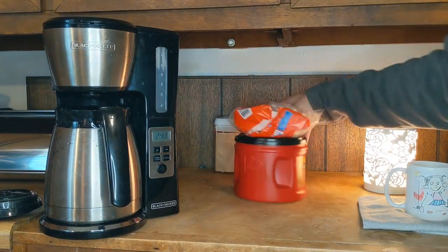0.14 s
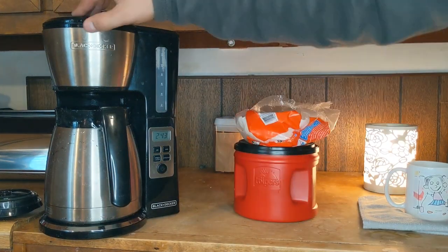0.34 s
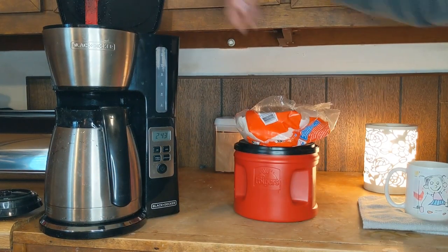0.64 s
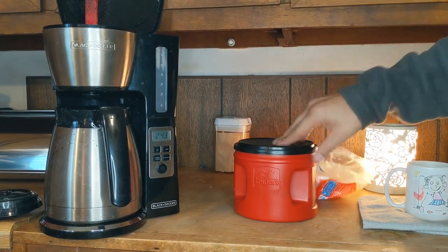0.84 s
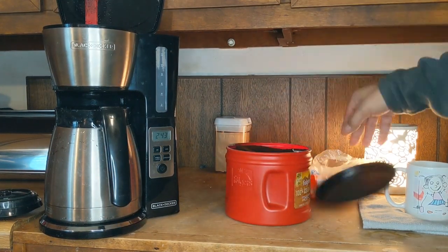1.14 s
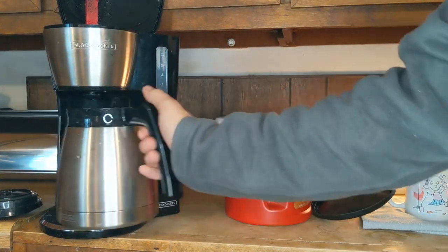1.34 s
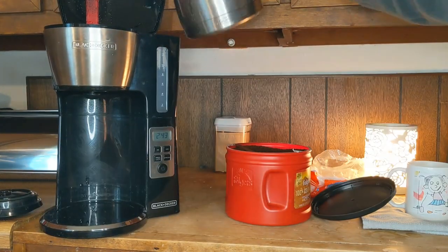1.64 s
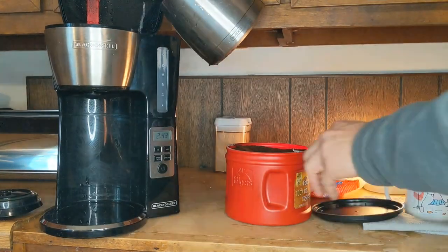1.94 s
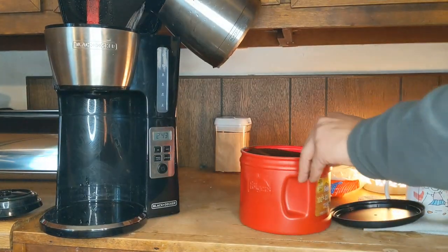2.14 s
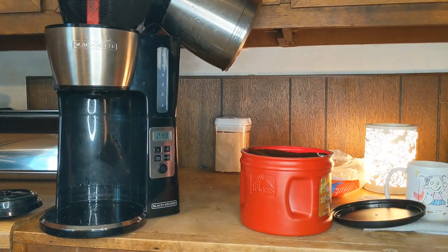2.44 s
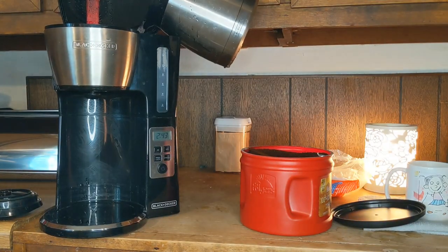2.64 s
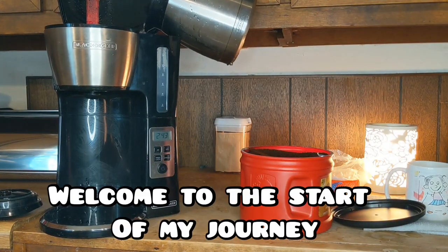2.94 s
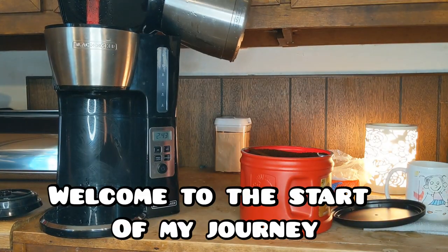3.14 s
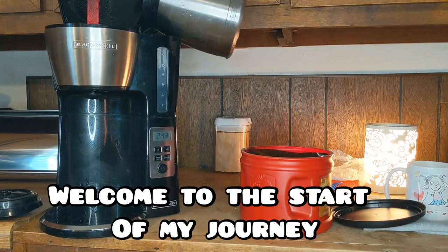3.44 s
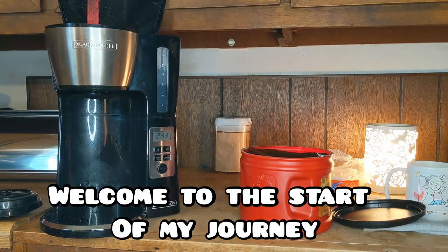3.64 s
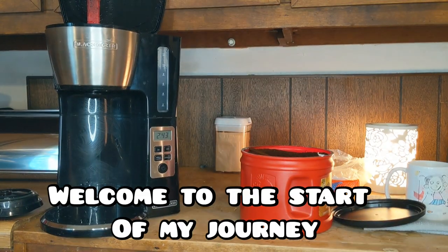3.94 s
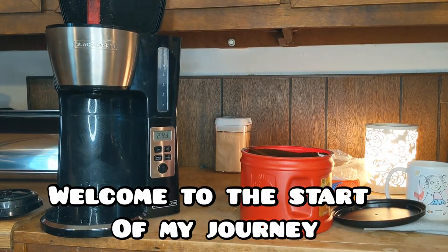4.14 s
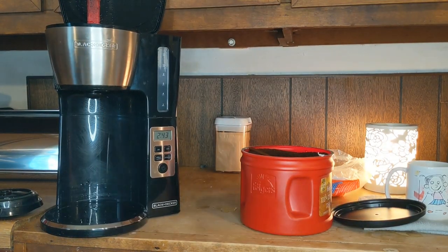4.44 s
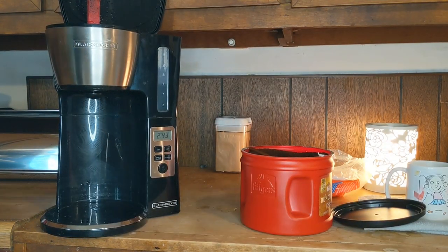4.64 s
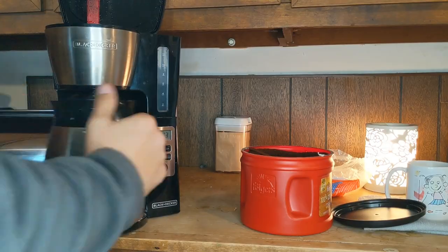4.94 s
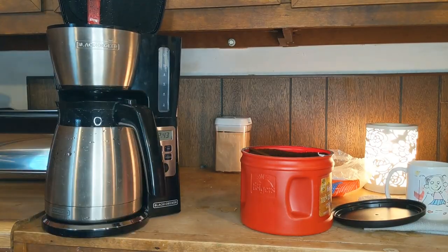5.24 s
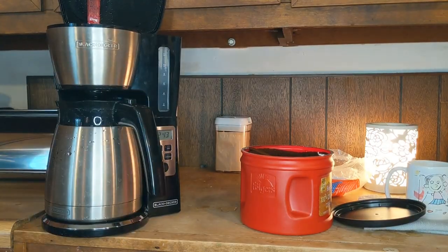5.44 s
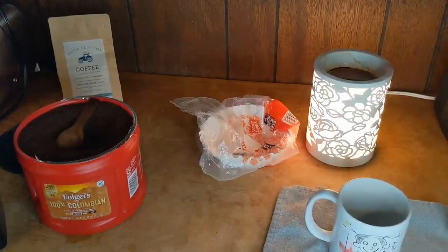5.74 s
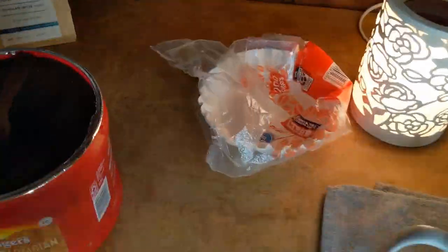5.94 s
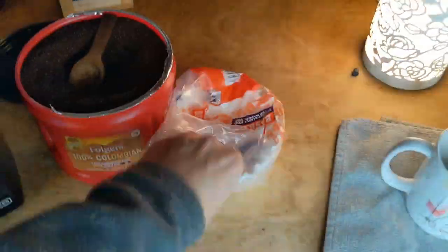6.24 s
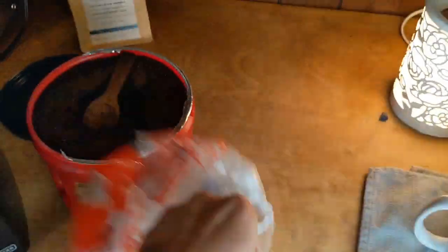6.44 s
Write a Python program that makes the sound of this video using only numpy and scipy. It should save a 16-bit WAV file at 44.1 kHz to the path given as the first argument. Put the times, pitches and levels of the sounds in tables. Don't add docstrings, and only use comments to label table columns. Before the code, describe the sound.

A close, dry stereo phone pickup of speeded-up kitchen handling, over faint hiss and low counter rumble. From 0 to 0.3 s a tub drags and a plastic bag crackles; a hollow knock lands near 0.47, then lighter rustle and knocks around 0.8. A lid pops with a bright click at 1.15, more knocks follow to 1.4, and a heavy low bump with clicks hits at 1.65, rebounding at 1.8. At 2.05 water splashes in, hissing spray first, then hollow gurgles and glugs, thinning to a trickle that stops near 3.5 with a small click. Soft air thumps come at 3.7 and 3.9. Scuffing at 4.1-4.4 and a brief squeal near 4.6 lead to loud hollow clunks at 4.76 and 4.85 and a snap at 4.99, with knocks to 5.06. Quieter bumps follow at 5.4-5.8; from 6.0 to the end film crackles densely, with a knock at 6.46.

```python
import sys
import numpy as np
from scipy import signal
from scipy.fft import rfft, irfft, next_fast_len
from scipy.io import wavfile
from scipy.ndimage import uniform_filter1d

SR = 44100
rng = np.random.default_rng(int(sys.argv[2]) if len(sys.argv) > 2 else 0)


def int16_out(signal):
    q = np.round(np.clip(np.atleast_2d(signal).T, -1, 1) * 32767)
    wavfile.write(sys.argv[1], SR, q.astype(np.int16))


def volts_from_db(level):
    exponent = np.asarray(level, float) / 20
    return 10 ** exponent


N = 289737


def evened(x):
    return x / np.sqrt(np.mean(x ** 2) + 1e-20)


def read(points, hz):
    f, value = np.transpose(points)
    return np.interp(np.log(hz + 1), np.log(f + 1), value)


def add(mix, s, sound):
    part = mix[max(round(s * SR), 0):][:len(sound)]
    part += sound[:len(part)]


def colour(x, points):
    size = next_fast_len(len(x), True)
    gain = volts_from_db(read(points, np.fft.rfftfreq(size, 1 / SR)))
    return evened(irfft(rfft(x, size) * gain, size)[:len(x)])


def resonate(x, hz, width):
    turn = np.exp(2j * np.pi * np.cumsum(hz * np.ones(len(x))) / SR)
    r = np.exp(-np.pi * width / SR)
    return evened((turn * signal.lfilter([1 - r], [1, -r], x / turn)).real)


def levels(rows):
    s, *columns = np.transpose(rows)
    return [volts_from_db(np.interp(np.arange(N) / SR, s, c, -140, -140)) for c in columns]


def strokes(s, db, rise, fall):
    at = np.arange(0, N + 32, 32)
    t = at[:, None] / SR - s
    gain = volts_from_db(db - 20 * np.where(t < 0, -t / rise, t / fall)).sum(axis=1)
    return np.interp(np.arange(N), at, gain)


def uneven_sizes(count, per_s, spread_db):
    return volts_from_db(spread_db * np.minimum(rng.exponential(1, count), 4)) * (rng.random(count) < per_s / SR)


def snap_train(count, per_s, spread_db, smear_s):
    size = uneven_sizes(count, per_s, spread_db)
    power = signal.oaconvolve(size ** 2, np.exp(-np.arange(1500) / (smear_s * SR)))[:count]
    return np.sqrt(abs(power) + 1) * rng.standard_normal(count)


def patchy(x, depth_db, bins=9, frames=9):
    z = signal.stft(x, nperseg=256, noverlap=192)[2]
    field = rng.standard_normal(z.T.shape).T
    for _ in range(2):
        field = uniform_filter1d(uniform_filter1d(field, bins, 0), frames, 1)
    return evened(signal.istft(z * volts_from_db(depth_db * evened(field)), nperseg=256, noverlap=192)[1][:len(x)])


# crest_s, level_db, rise_s and fall_s (over 20 dB), crispness_db
BAG_STROKES = [(.045, -60, .05, .05, -3), (.064, -59, .03, .04, -3), (.108, -60, .03, .1, 9),
               (.148, -57, .06, .08, 11), (.175, -59, .05, .09, 10), (.204, -63, .05, .015, 9),
               (.244, -67, .05, .03, 3), (.257, -69, .03, .012, 1), (.33, -71, .025, .25, -1),
               (.435, -77, .015, .05, 8), (.705, -68, .012, .15, 2), (.735, -65, .05, .05, 0),
               (.81, -62, .04, .1, 9), (1.008, -61, .03, .12, -2), (1.06, -65, .06, .06, 2),
               (5.87, -72, .04, .4, -3), (6.024, -64, .04, .15, 2), (6.092, -53, .09, .1, 2),
               (6.152, -56, .09, .13, 5), (6.206, -57, .015, .08, 3), (6.24, -56, .05, .05, 0),
               (6.282, -55, .02, .03, 6), (6.328, -55, .08, .09, 4), (6.392, -56, .025, .12, 3),
               (6.43, -59, .04, .06, 3), (6.466, -52, .035, .05, 5), (6.522, -58, .05, .08, 1)]
# crest_s, level_db, rise_s and fall_s (over 20 dB), crispness_db
GRIP_STROKES = [(1.88, -74, .15, .2, 4), (1.966, -56, .018, .055, -4), (3.748, -65, .07, .04, 0),
                (3.83, -73, .06, .06, -3), (3.895, -66, .03, .1, -3), (3.96, -65, .05, .06, -3),
                (3.99, -69, .05, .015, 0), (4.055, -66, .02, .2, 10), (4.114, -48, .01, .25, 7),
                (4.19, -47, .09, .12, 2), (4.26, -55, .05, .03, -2), (4.31, -57, .03, .2, -5),
                (4.395, -53, .02, .13, -3), (4.648, -56, .3, .07, -6), (4.75, -57, .05, .25, -12),
                (5.11, -68, .05, .08, 0), (5.335, -64, .05, .15, -2), (5.51, -75, .08, .05, -8)]
# frequency_hz, density_db
FILM_SPECTRUM = [(710, -11), (1200, -3.5), (2200, -5.5), (5530, -6), (6650, -10.5), (7490, -11),
                 (11800, -18), (16000, -26)]
# frequency_hz, density_db
SCRAPE_SPECTRUM = [(90, -16), (160, -2), (300, -4), (500, -4.5), (900, -2.5), (1400, -12), (2200, -16.5),
                   (4000, -50)]
# time_s, level_db, squeal_hz
BASE_SLIDE = [
    (4.5, -59, 1060),
    (4.514, -67.5, 1080),
    (4.64, -50, 980),
    (4.69, -84, 980),
]
# (over 20 dB, either side)
WEIGHT_SHIFTS = [
    (.05, -66, 1.2),
    (.9, -63, .4),
    (2.1, -66, .5),
    (3.95, -60, .4),
    (4.6, -69, 1.5),
    (5.3, -63, .5),
    (5.98, -62, .3),
    (6.3, -62, .3),
]
# frequency_hz, density_db
COUNTER_SPECTRUM = [(12, 8), (30, -1.5), (60, 7), (110, -3), (200, -57), (400, -38.5)]


def hands():
    house_db = -75
    rest_dull_db, rest_bright_db, rest_scrape_db = -82, -86, -79
    crisp_steep = 1.3
    s, db, rise, fall, crisp = np.transpose(BAG_STROKES + GRIP_STROKES)
    dull = strokes(s, db, rise, fall) + volts_from_db(rest_dull_db)
    bright = strokes(s, db + crisp, rise / crisp_steep, fall / crisp_steep) + volts_from_db(rest_bright_db)
    scrape_db = db + np.repeat((2, 1.5), [len(BAG_STROKES), len(GRIP_STROKES)]) - 0.5 * crisp
    scrape = strokes(s, scrape_db, rise, fall) + volts_from_db(rest_scrape_db)
    film = snap_train(N, per_s=500, spread_db=1.5, smear_s=0.0034)
    film = patchy(colour(film, FILM_SPECTRUM), depth_db=2.0)
    top = colour(film, [(3800, -22), (5200, -2), (16000, 10)])
    low = colour(film, [(1000, -5), (1600, -3.5), (4000, 2), (5200, -10.5)])
    bodies = snap_train(N, per_s=60, spread_db=2.5, smear_s=0.0027)
    bodies = patchy(colour(bodies, SCRAPE_SPECTRUM), depth_db=2.5, bins=2)
    s, db, hz = np.transpose(BASE_SLIDE)
    squeal_hz = np.interp(np.arange(N) / SR, s, hz)
    squeal = levels(BASE_SLIDE)[0] * resonate(bodies, squeal_hz, width=48)
    s, db, fade = np.transpose(WEIGHT_SHIFTS)
    shaking = strokes(s, db, fade, fade) + volts_from_db(house_db)
    counter = shaking * colour(rng.standard_normal(N), COUNTER_SPECTRUM)
    return dull * low + bright * top + scrape * bodies + squeal + counter


# start_s, peak_db, body_hz, crack_db (re peak), burst_s
SET_DOWN_KNOCKS = [(.322, -41.5, 320, -16, .018), (.369, -48, 371, -20, .0093),
                   (.467, -28.5, 340, -23.5, .025), (.812, -35, 596, -9.5, .014),
                   (.845, -33, 380, -21, .0069), (1.138, -28, 910, -8, .019),
                   (1.3, -29.5, 650, -19.5, .016), (1.368, -32.5, 600, -18.5, .014),
                   (1.757, -28.5, 310, -30, .022), (3.503, -51, 908, -9.5, .033),
                   (4.962, -40, 300, -12, .014), (4.976, -30, 400, -17, .03),
                   (5.041, -27.5, 240, -22.5, .022), (5.157, -51, 484, -10, .038),
                   (5.179, -47.5, 316, -17, .02), (5.577, -52.5, 690, -18, .012),
                   (5.799, -41, 594, -17, .02), (6.455, -26, 208, -13, .012)]
# start_s, peak_db, body_hz, crack_db, burst_s
SNAP_KNOCKS = [
    (1.15, -26, 540, -13, .019),
    (1.959, -44.5, 360, -20, .019),
    (4.111, -43, 630, -26, .037),
    (4.648, -39.5, 1030, -7, .0069),
    (4.764, -24, 600, -17, .026),
    (4.78, -31, 266, -14.5, .021),
    (4.848, -24, 800, -10, .024),
    (4.99, -21.5, 700, -20, .018),
]
# start_s, peak_db, body_hz, crack_db (re peak), burst_s
HEAVY_BUMPS = [
    (1.642, -20, 307, -24, .027),
    (1.788, -35, 296, -29, .017),
    (5.615, -50, 473, -20, .03),
    (5.766, -48, 200, -13, .0082),
]
# frequency_hz, density_db
CRACK_SPECTRUM = [(710, -21.5), (1200, -2), (2350, -3), (3220, -0.5), (5710, -6), (6650, -10),
                  (11900, -14.5), (16000, -29)]


def knocks():
    out, t = np.zeros(N), np.arange(6000) / SR
    # knocks, thud level re peak (dB), time contact takes to build (s)
    kinds = [(SET_DOWN_KNOCKS, -19, .0012), (SNAP_KNOCKS, -45, .0008), (HEAVY_BUMPS, -7.5, .003)]
    rows = [(*row, thud_db, build) for kind, thud_db, build in kinds for row in kind]
    for s, db, hz, crack_db, length, thud_db, build in rows:
        a, b, c, rattle = rng.standard_normal((4, len(t)))
        after = np.maximum(t - length, 0)
        rise = 1 - np.exp(-t / build)
        rattle = volts_from_db(1.75 * evened(uniform_filter1d(rattle, 60)))
        thud = colour(a, [(25, 7), (60, -7), (150, -4.5), (260, 0), (600, -62.5)])
        thud = volts_from_db(thud_db + 4.5 - 60 * after / 0.092) * thud * (1 - np.exp(-t / 0.0027))
        wide = colour(b, [(120, -56.5), (300, 6.5), (1000, 1.5), (2200, -20), (5000, -75.5)])
        parts = 0.82 * wide * rattle + 0.46 * resonate(b, hz, width=55)
        body = volts_from_db(-11 - 60 * after / 0.08) * parts / np.std(parts[:1200])
        crack = volts_from_db(crack_db - 0.5 - 60 * after / 0.084) * rattle * colour(c, CRACK_SPECTRUM)
        crack = crack * (1 - 0.23 * np.exp(-t / 0.005))
        add(out, s + .0015, volts_from_db(db) * rise * (thud + body + crack))
    return out


# start_s, level_db, pitch_hz, t60_s
FREE_RINGS = [(0.43, -62, 380, .1), (.47, -41, 1900, 0.052), (.92, -55, 380, .05), (1.395, -68, 745, 0.3),
              (1.81, -71, 2611, 0.3), (3.482, -56, 174, 0.087), (4.228, -49, 119, 0.074),
              (4.24, -38.5, 296, 0.045), (4.395, -48, 187, 0.13), (4.782, -30, 954, .045),
              (4.885, -61, 454, 0.4), (6.46, -41, 150, .07)]
# start_s, peak_db, pitch_hz,
# hold_s
HELD_RINGS = [(.845, -37, 370, .012), (2.54, -58, 770, .05), (2.55, -56, 570, .045), (2.63, -55, 520, .11),
              (2.815, -49, 390, .04), (2.855, -57, 1590, .045), (2.96, -58, 370, .07),
              (2.97, -60, 790, .05), (3.0, -60, 1590, .045), (3.27, -62, 1590, .06), (3.36, -59, 670, .045),
              (3.93, -55, 4600, .012), (3.94, -57, 4200, .015), (4.189, -38, 650, .025),
              (4.24, -52, 5200, .022), (4.248, -45, 3093, .022), (4.308, -50, 831, .045),
              (4.53, -56, 2500, .03), (4.605, -47, 950, .03), (4.646, -35, 1010, .016),
              (4.732, -43, 332, .03), (4.765, -18.5, 247.5, .021), (4.85, -34, 411, .03),
              (4.851, -31, 980, .022), (4.99, -26.5, 434, .021), (4.993, -30, 620, .014),
              (1.141, -40, 915, .04), (1.141, -42, 2150, .012), (1.158, -38, 533, .012),
              (1.152, -41, 3280, .022), (1.148, -42, 5590, .03), (1.385, -66, 3300, .03),
              (1.385, -69, 2600, .025), (1.647, -30, 926, .012), (4.155, -48, 3300, .022),
              (4.44, -49, 290, .025), (4.44, -51, 680, .018), (4.55, -54, 310, .04), (4.55, -51, 1100, .04),
              (4.55, -55, 700, .05), (4.562, -58, 2150, .015), (5.393, -57, 1050, .012),
              (5.398, -62, 4350, .012), (5.395, -60, 482, .05), (4.06, -57, 200, .03),
              (4.39, -55, 1850, .02)]


def rings():
    closing_t60 = .03
    out, t = np.zeros(N), np.arange(12000) / SR
    rows = [(s, db + 9, hz, 0, t60) for s, db, hz, t60 in FREE_RINGS]
    rows += [(*row, closing_t60) for row in HELD_RINGS]
    for s, db, hz, hold, t60 in rows:
        waver = resonate(rng.standard_normal(len(t)), hz, width=40 + 0.021 * hz)
        tone = np.sin(2 * np.pi * hz * t) + 0.2 * waver
        decay = volts_from_db(db - 60 * np.maximum(t - hold, 0) / t60)
        add(out, s, decay * (1 - np.exp(-(t / 0.0042) ** 2)) * tone)
    return out


# start_s, peak_db, pitch_hz, sharpness (0-1)
HARD_TICKS = [(.483, -40, 1220, 0.9), (1.1605, -19, 3100, 1), (1.653, -24, 900, .1),
              (1.6685, -22, 700, 0.2), (2.727, -38, 910, 0), (3.516, -29, 1530, .6), (4.052, -42, 6000, .9),
              (4.654, -42, 1010, 0.4), (4.872, -27, 1300, .5), (5.77, -38, 300, 0), (5.582, -45, 690, 0),
              (6.237, -40, 1200, .2), (6.42, -40, 1100, .1), (.478, -42, 6000, 1), (5.043, -26, 700, .2),
              (5.063, -23.5, 900, 0.13), (5.63, -31, 497, 0), (5.806, -25, 600, 0.35),
              (6.272, -25, 1210, 0), (6.469, -26, 724, 0.4)]


def ticks():
    out, t = np.zeros(N), np.arange(600) / SR
    for s, db, hz, sharp in HARD_TICKS:
        spike = resonate(rng.standard_normal(len(t)), 3500, width=11000) * np.exp(-t / 0.0011)
        cycles = np.sin(2 * np.pi * hz * t) * np.exp(-hz * t / 0.82)
        add(out, s, volts_from_db(db) * (sharp * spike + cycles))
    return out


# crest_s, level_db, pitch_hz, signed_size
AIR_THUMPS = [(.57, -49, 50.4, 0.94), (.865, -46, 46.6, -1.3), (.915, -42, 49.6, 0.83),
              (1.658, -24, 60, -1.2), (1.782, -30.5, 60.5, -1.2), (3.716, -30, 28.5, 0.92),
              (3.937, -27.5, 37, -0.8), (4.67, -52, 60, 1), (5.19, -39.5, 24.4, -1.4),
              (5.44, -39.5, 26.5, -1.1), (5.638, -46, 55, -1), (5.792, -42, 39, -1.2),
              (6.365, -47, 40, 0.87), (6.469, -38, 59.5, 1)]


def thumps():
    out, t = np.zeros(N), np.arange(-4000, 9000) / SR
    for s, db, hz, sign in AIR_THUMPS:
        swing = np.exp(-(hz * t / .55) ** 2)
        settling = 0.4 * np.exp(-abs(hz * t) / np.where(t > 0, 2.2, .3))
        push = (swing + settling) * np.cos(2 * np.pi * hz * t) / 1.69
        add(out, s - 4000 / SR, sign * volts_from_db(db) * push)
    return out


def bubbles(n, lo_hz, hi_hz, per_s, cycles, spread_db, count=14):
    out = np.zeros(n)
    for hz in np.geomspace(lo_hz, hi_hz, count):
        u = np.arange(int(4 * cycles / hz * SR)) / SR * hz / cycles
        size = uneven_sizes(n, per_s / count, spread_db)
        chirp = np.sin(2 * np.pi * cycles * (u + 0.044 * u ** 2))
        out += signal.oaconvolve(size, u * np.exp(-2 * u) * chirp * np.sqrt(hz))[:n]
    return evened(out)


# time_s, level_db
STREAM_LEVEL = [
    (2.04, -78),
    (2.052, -60),
    (2.3, -60),
    (2.75, -68),
    (3.25, -69),
    (3.52, -67),
    (3.55, -90),
]
# crest_s, level_db, fall_s (over 20 dB)
STREAM_GULPS = [(2.1, -50, .07), (2.196, -51, .08), (2.274, -53.5, .8), (2.728, -56, .035), (2.82, -61, .2),
                (2.932, -61, .15), (3.0, -63, .1), (3.12, -67, .08), (3.19, -66, .1), (3.352, -64, .12),
                (3.46, -63, .12), (3.517, -54, .035)]
# frequency_hz, density_db
SPRAY_SPECTRUM = [(880, -12), (1500, -7), (1980, -7), (4920, -8), (5710, -8.5), (6560, -12), (9850, -11.5),
                  (16000, -17)]
# frequency_hz, density_db
TANK_SPECTRUM = [(59, -49), (100, -7), (237, -11), (446, -6), (785, 8), (1100, 5), (2500, -14), (3250, -51)]
# pitch_hz, width_hz, level_db
AIR_COLUMN = [(380, 13, -17), (520, 40, -14), (800, 45, -31), (1588, 20, -16)]
# start_s, peak_db, pitch_hz
LOW_GLUGS = [(2.189, -52, 956), (2.28, -52, 480), (2.311, -47, 1350), (2.312, -50, 1080), (2.33, -49, 1420),
             (2.33, -50, 2100), (2.383, -49, 778), (2.431, -48, 598), (2.48, -50, 710), (2.543, -49, 589),
             (2.58, -48, 540), (2.58, -50, 790), (2.633, -50, 970), (2.722, -42, 950), (2.722, -44, 700),
             (2.811, -44, 692), (2.85, -49, 800), (2.955, -44, 668), (2.955, -49, 930), (2.98, -53, 600),
             (3.02, -52, 960), (3.072, -46, 807), (3.121, -53, 1000), (3.187, -50, 794), (3.2, -52, 980),
             (3.3, -53, 850), (3.346, -47, 1000), (3.346, -51, 750), (3.42, -54, 1080), (3.458, -47, 650),
             (3.511, -46, 930)]
# start_s, peak_db, pitch_hz
HIGH_SPLASHES = [(2.0478, -42, 5330), (2.0971, -25.5, 4080), (2.1675, -31.5, 6000), (2.2687, -33.5, 5260),
                 (2.4659, -35, 9900), (2.608, -36.5, 3080), (2.7263, -32, 8300), (2.8143, -38.5, 5800),
                 (2.9272, -28.5, 4420), (2.9287, -32, 5400), (2.9, -43, 7600), (3.0006, -36, 5670),
                 (3.025, -42, 9000), (3.0754, -42, 3600), (3.1173, -44, 5800), (3.13, -41, 7500),
                 (3.16, -38, 4000), (3.19, -47, 7240), (3.263, -46, 7380), (3.302, -44, 3760),
                 (3.487, -43, 6000), (3.3264, -40, 8250), (3.3733, -43, 3340), (3.4681, -45, 3220),
                 (3.514, -48, 6000)]


def pour():
    water = slice(2 * SR, round(3.6 * SR))
    s, db, fall = np.transpose(STREAM_GULPS)
    spray = levels(STREAM_LEVEL)[0] + strokes(s, db, .018, fall)
    begin, end = STREAM_LEVEL[0][0], STREAM_LEVEL[-1][0]
    gurgle_db = np.interp(np.arange(N) / SR - begin, [0, .55, end - begin], [-24, 2, -1.5])
    gurgle = (spray * volts_from_db(gurgle_db))[water]
    spray, out = spray[water], np.zeros(N)
    n = len(spray)
    fizz = evened(snap_train(n, per_s=160, spread_db=0.0, smear_s=0.0024))
    fizz = fizz + 0.1 * bubbles(n, 2010, 14000, per_s=520, cycles=9.5, spread_db=13.5)
    tank = .9 * rng.standard_normal(n) + .6 * bubbles(n, 330, 1800, per_s=700, cycles=5, spread_db=2.5)
    column = sum(volts_from_db(db) * resonate(tank, hz, width) for hz, width, db in AIR_COLUMN)
    out[water] = spray * patchy(colour(fizz, SPRAY_SPECTRUM), depth_db=1.0)
    out[water] += gurgle * (colour(tank, TANK_SPECTRUM) + column)
    t = np.arange(2000) / SR
    for s, db, hz in LOW_GLUGS:
        envelope = t / .006 * np.exp(1 - t / .006)
        add(out, s, volts_from_db(db - 2) * envelope * np.sin(2 * np.pi * hz * (.97 * t + 1.5 * t ** 2)))
    for s, db, hz in HIGH_SPLASHES:
        beats = 0.3 + 0.26 * np.cos(2 * np.pi * 172 * t - 2.5)
        band = resonate(rng.standard_normal(len(t)), hz, width=0.13 * hz)
        band = resonate(band, hz, width=0.13 * hz)
        envelope = np.exp(-(t / .022) ** 3) * (1 - np.exp(-t / 0.00067))
        add(out, s, volts_from_db(db - 11.5) * beats * envelope * band)
    return out


def tail(t60):
    x = rng.standard_normal(8000) * volts_from_db(-60 * np.arange(8000) / SR / t60)
    return x / np.linalg.norm(x)


def walls(x):
    turn = 2 * np.pi * (np.arange(N) / SR * 9 + np.arange(3)[:, None] / 3)
    share = np.sqrt((1 + np.cos(turn)) / 3)
    return sum(signal.oaconvolve(x * w, tail(t60=0.08))[:N] for w in share)


# frequency_hz, likeness (0-1)
PORT_LIKENESS = [(60, 1), (180, .99), (300, .88), (600, .76), (1200, .55), (2500, .33), (12000, .25)]
# frequency_hz, difference_db
PORT_LEAN = [(60, 0.7), (150, -3), (300, 8), (600, 4.5), (1200, 2.5), (3000, 2), (5500, -1), (10000, 7)]
# frequency_hz, phase_rad
PORT_LEAD = [(60, 0.38), (150, 0), (300, 1.06), (600, 1.17), (1200, 0.21), (2500, 1.25), (12000, 1.5)]
# frequency_hz, density_db
FLOOR_SPECTRUM = [(59, -43), (100, -11), (277, -11), (583, -12), (1870, -30), (5770, -30.5), (6560, -36),
                  (16000, -31)]


def scene():
    x = hands() + knocks() + rings() + pour()
    x = x + volts_from_db(-14) * walls(x) + thumps()
    hz, _, z = signal.stft(x, SR, nperseg=512, noverlap=384)
    same = np.clip(read(PORT_LIKENESS, hz), 0, 1)[:, None]
    lean = volts_from_db(read(PORT_LEAN, hz) / 2)[:, None]
    lead = read(PORT_LEAD, hz)[:, None]
    field = rng.standard_normal(z.T.shape + (2,))
    a, b = uniform_filter1d(field, size=3, axis=1).T
    paths = (a + 1j * b) / np.hypot(a, b)
    right = (same * np.exp(-1j * lead) + 1.344 * np.sqrt(1 - same ** 2) * paths) / lean
    trim = 2 / np.sqrt(lean ** 2 + lean ** -2 + 2 * same * np.cos(lead))
    ports = signal.istft(np.array([lean * z, right * z]) * trim, nperseg=512, noverlap=384)[1][:, :N]
    near = ticks()
    ports = ports + np.array([1.0 * near, 0.64 * np.roll(near, shift=-2)])
    left_hiss, right_hiss, shared = [colour(rng.standard_normal(N), FLOOR_SPECTRUM) for _ in range(3)]
    hiss = np.array([0.49 * left_hiss + 0.27 * shared, 0.29 * right_hiss + 0.34 * shared])
    return ports + volts_from_db(-63.5) * hiss


def low_pass(x):
    return signal.sosfilt(signal.butter(12, 16480, fs=SR, output="sos"), x)


# pitch_hz, width_hz, level_db
CASE_RESONANCES = [(3200, 800, 2.5), (5700, 800, 4.5), (7600, 700, 3.5), (9700, 700, 3.5),
                   (11900, 700, 3.5)]


def record(dry):
    size = next_fast_len(N, True)
    hz = np.fft.rfftfreq(size, 1 / SR)
    case_db = -2.5 + sum(db / (1 + (2 * (hz - f) / width) ** 2) for f, width, db in CASE_RESONANCES)
    mix = irfft(rfft(dry, size) * volts_from_db(case_db) * (hz < 15830), size)[:, :N]
    return low_pass(mix)


dry = scene()
out = record(dry)
int16_out(out)
```